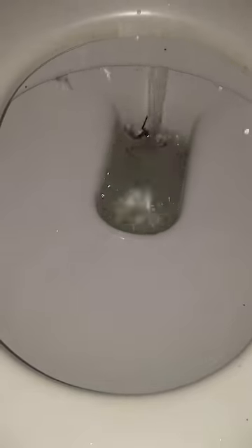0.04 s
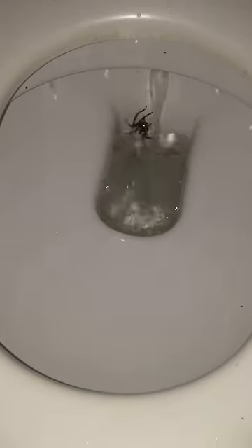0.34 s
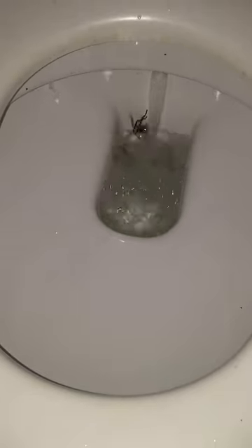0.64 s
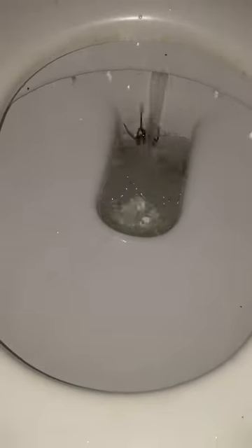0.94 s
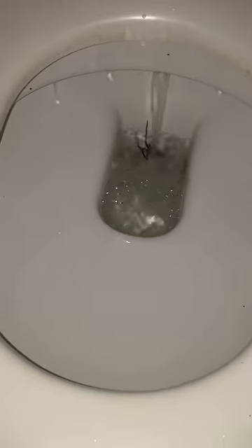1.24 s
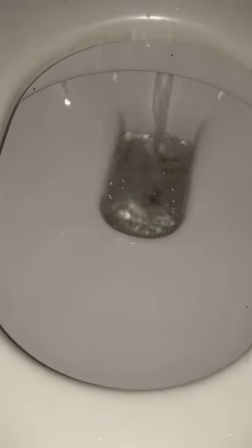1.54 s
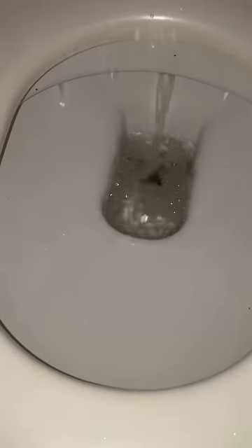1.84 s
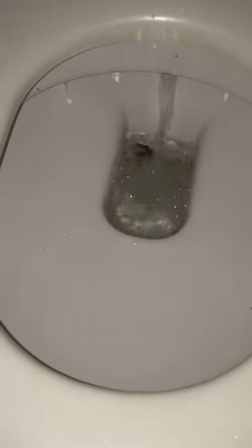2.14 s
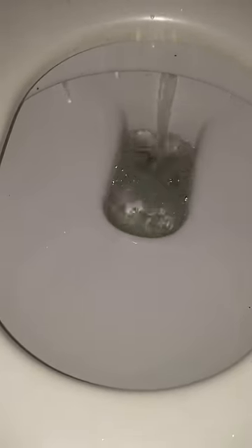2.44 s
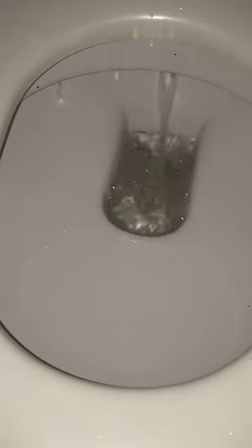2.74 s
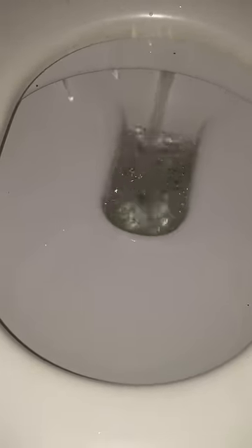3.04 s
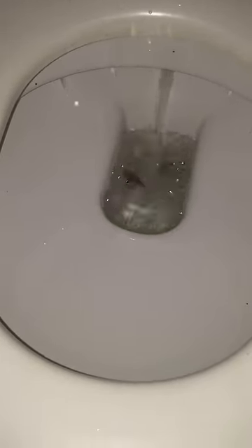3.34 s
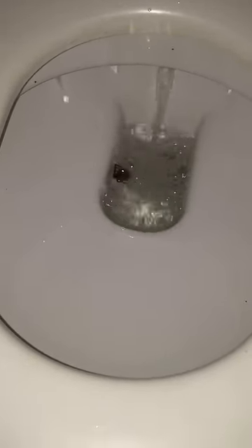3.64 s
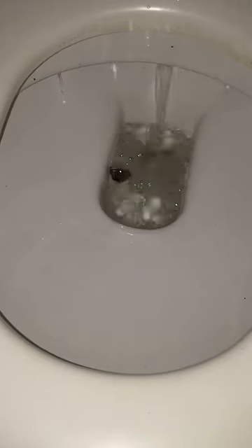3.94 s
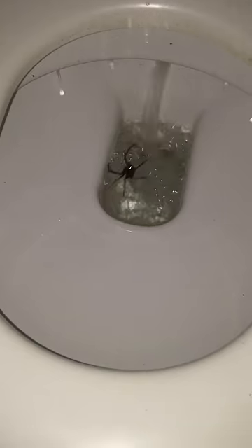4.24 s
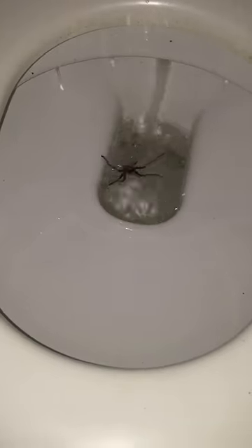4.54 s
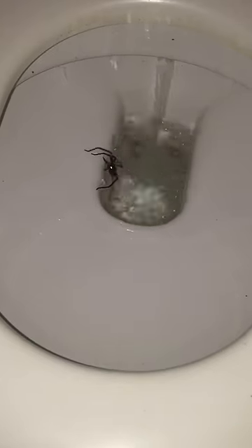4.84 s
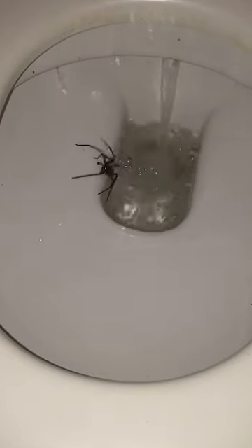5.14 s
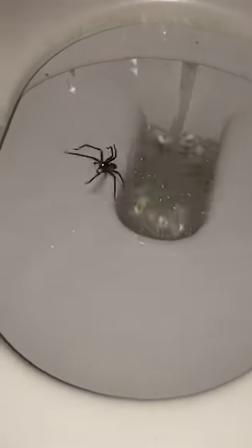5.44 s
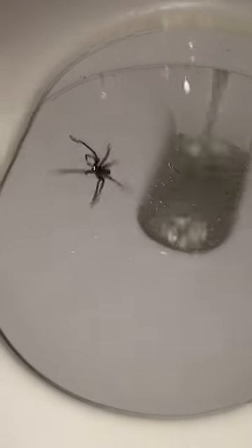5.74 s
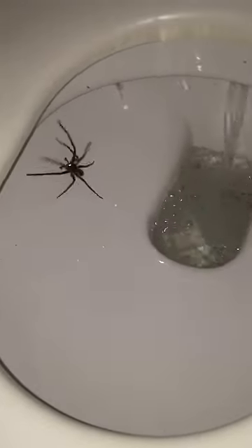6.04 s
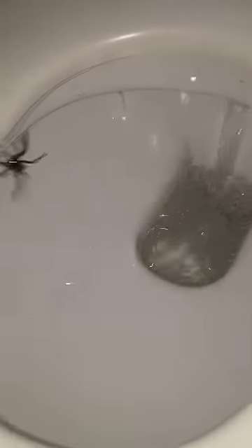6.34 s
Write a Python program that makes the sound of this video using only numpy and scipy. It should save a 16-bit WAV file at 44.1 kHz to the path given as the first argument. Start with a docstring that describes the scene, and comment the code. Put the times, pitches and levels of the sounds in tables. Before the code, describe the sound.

A thin stream of water pours continuously into the pool of a toilet bowl. A sharp little bubble snap comes right at the start, then the water babbles on with low, hollow gulps, chirping bubbles and ticking drops, now and then splashing harder. It is heard close up, ringing in the porcelain bowl and a small, hard-walled bathroom, over a faint low rumble.

```python
"""In a small, hard-walled bathroom, a thin stream runs from a toilet's rim into the pool below.
It drags air under the water: big pockets gulp, small bubbles chirp upward, and one bursts with a snap.
Drops of spray tick on the pool, and now and then the stream breaks up and splashes harder.
The water is heard close up, ringing in the hollow bowl and the room, over a faint low rumble."""
import sys
import numpy as np
from scipy import signal
from scipy.io import wavfile

SR = 44100
rng = np.random.default_rng(int(sys.argv[2]) if len(sys.argv) > 2 else 0)


def persist_wave(psi):
    """Save psi, clipped to +-1, as 16-bit WAV."""
    counts = np.round(np.clip(psi, -1, 1) * 32767).astype(np.int16)
    wavfile.write(sys.argv[1], SR, np.atleast_2d(counts).T)


N = 282240

TIME = np.arange(N) / SR
YIELD_S, CRACK_S = 0.005, 0.00068  # how long the surface gives way under a drop, and how long it cracks
SHORT_RING_CYCLES, LONG_RING_CYCLES = 14, 21  # how many swings a bubble rings for


def to_gain(db):
    """Turns decibels into a gain to multiply by."""
    return 10 ** (np.asarray(db) / 20)


def levelled(x):
    """Scales a sound to an average (rms) level of 1."""
    return x / np.sqrt(np.mean(x ** 2) + 1e-20)


def die_away(t, t60):
    """A smooth fade, 60 dB down after t60 seconds."""
    return np.exp(-np.log(1000) * t / t60)


def mix_in(mix, s, sound):
    """Mixes a sound in, starting at s seconds."""
    start = round(s * SR)
    part = mix[max(start, 0):]
    sound = sound[max(-start, 0):][:len(part)]
    part[:len(sound)] += sound


def shape_tone(x, points, size=4096):
    """Makes some pitches louder and others softer, along a curve of (Hz, dB) points."""
    hz, db = np.transpose(points)
    bin_hz = abs(np.fft.fftfreq(size, 1 / SR))
    log_gain = np.log(to_gain(np.interp(np.log(bin_hz + 1), np.log(hz), db)))
    taps = np.fft.ifft(np.exp(np.conj(signal.hilbert(log_gain)))).real  # rings only after a sound
    return signal.oaconvolve(x, taps[:size // 2])[:len(x)]


def cut_lows(x, hz, order=2):
    """Turns down what lies below hz."""
    return signal.sosfilt(signal.butter(order, hz, "high", fs=SR, output="sos"), x)


# First echoes off the porcelain. Each row: delay in seconds, gain.
PORCELAIN_ECHOES = [(.00055, 0.24), (.0013, 0.22), (.0033, 0.2), (.0058, 0.12), (.011, 0.16),
                    (0.0153, 0.15)]
# Notes at which the air in the bowl and room rings.
# Each row: pitch in Hz, ring time in seconds, strength in dB.
AIR_NOTES = [(204.5, 0.66, 21.5), (239.4, 0.47, 24), (263, 0.22, 19.5), (280.1, 0.43, 26),
             (342.8, 0.19, 15), (455, 0.26, 9), (513.6, 0.21, 11.5), (578.3, 0.073, 16),
             (610.2, 0.34, 22.5), (970, 0.26, 10.5), (1011.5, 0.27, 12.5), (1046.6, 0.28, 20),
             (1193, 0.28, 5), (1503, 0.16, 7), (1502, 1, 4), (1806, 0.34, 10.5), (1892, 0.23, 3),
             (1986, 0.32, 12.5), (2224, 0.16, 14.5), (2255, 0.22, 10), (2621, 0.11, 3.5)]

def bowl_response(spot_db=2.5, spot_detune=0.006):
    """How a click at one spot of the pool reaches us: directly, as echoes, and as ringing air."""
    t = TIME[:SR // 2]
    path = np.zeros(len(t))
    for delay, gain in [(0.00016, 0.91)] + PORCELAIN_ECHOES:  # the direct sound comes first
        mix_in(path, delay, np.array([gain]))
    scatter, room = rng.standard_normal((2, len(t))) * (1 - die_away(t, 0.0015))
    tail = to_gain(-5.5) * levelled(scatter * die_away(t, 0.063))
    tail += to_gain(0.5) * levelled(room * die_away(t, 0.2))
    path += cut_lows(tail, 326) / np.sqrt(len(t))
    for (hz, t60, db), (louder, higher) in zip(AIR_NOTES, rng.uniform(-1.2, 1, (len(AIR_NOTES), 2))):
        hz *= 1 + spot_detune * higher  # each spot rings the notes a little differently
        db += spot_db * louder
        ring = die_away(t, t60)
        path += to_gain(db) * 2 * ring / ring.sum() * np.cos(2 * np.pi * hz * t)
    return cut_lows(path, 117, order=4)


def in_bowl(sound, spots, peak_db, direct=0):
    """Plays a sound from a random spot of the pool; one out in the open has more direct sound."""
    wet = signal.fftconvolve(sound, spots[int(rng.random() * len(spots))])
    mix_in(wet, 0, direct * cut_lows(sound, 230, order=4))
    return to_gain(peak_db) * wet / abs(wet).max()


def wander_over_pool(source, spots, per_s=14):
    """The stream wanders over the pool, so the bowl colours it differently from moment to moment."""
    steps = rng.random(400) * (len(spots) - 1)
    where = np.interp(TIME * per_s, np.arange(len(steps)), steps)
    out = np.zeros(N)
    for spot, path in enumerate(spots):
        nearness = np.maximum(1 - abs(where - spot), 0)
        out += signal.oaconvolve(source * np.sqrt(nearness), path)[:N]
    return out


def unevenness(per_s):
    """A random curve that heads for a new value per_s times a second."""
    steps = rng.standard_normal(1000)
    return np.interp(TIME * per_s, np.arange(len(steps)), steps)


def air_bubble(hz, swell_s, cycles, rise):
    """A bubble swells and rings out; nearing the surface, its pitch climbs by rise octaves a second."""
    t60 = cycles / hz
    t = np.arange(-swell_s, t60, 1 / SR)
    level = np.where(t < 0, np.cos(np.pi / 2 * t / swell_s) ** 2, die_away(t, t60))
    return level * np.sin(2 * np.pi * np.cumsum(hz * 2 ** (rise * t)) / SR)


def wet_burst(hz, t60, octaves=1):
    """A short splash of torn water, some octaves either side of hz."""
    t = TIME[:SR // 25]
    band = signal.butter(1, [hz / 2 ** octaves, min(hz * 2 ** octaves, SR / 2 - 1)], "band", fs=SR)
    return levelled(signal.lfilter(*band, rng.standard_normal(len(t)))) * die_away(t, t60)


# How strongly bubbles of each size ring within a swarm. Each row: pitch in Hz, strength in dB.
BUBBLE_STRENGTHS = [(240, -6), (450, -5.5), (750, -2.5), (1050, -6.5), (1600, 3), (2400, -1), (3100, 14),
                    (4200, 6.5), (5800, -1.5), (8000, -11), (13000, -2.5)]

def bubble_swarm(low_hz, high_hz, spread_db, cycles, swell_cycles, rise, count, sizes=130):
    """Bubbles of many sizes, each size born count times at random moments and strengths."""
    out = np.zeros(N)
    for step, (jitter, length, onset, climb) in enumerate(rng.random((sizes, 4))):
        hz = low_hz * (high_hz / low_hz) ** ((step + jitter) / sizes)
        swell_s = (0.5 + swell_cycles * onset ** 2) / hz
        ping = air_bubble(hz, swell_s, cycles * (0.5 + length), 2 * rise * climb)
        ping *= to_gain(np.interp(hz, *np.transpose(BUBBLE_STRENGTHS)))
        when, chance = rng.random((2, count))
        for start, gain in zip(when * N / SR, to_gain(-spread_db * np.log(chance + 0.052))):
            mix_in(out, start, gain * ping)
    return out


def droplets(low_hz=4200, high_hz=14000, spread_db=4, tilt_db=-3, crack_db=4, ping_db=6, count=450):
    """Flung droplets land one by one, each with a brief wet tick and a tiny ping of its own pitch."""
    out = np.zeros(N)
    for when, pitch, softness in rng.random((count, 3)):
        hz = low_hz * (high_hz / low_hz) ** pitch
        tick = wet_burst(hz, t60=0.035, octaves=0.25)
        tick *= 1 - die_away(TIME[:len(tick)], YIELD_S)
        tick += to_gain(crack_db) * wet_burst(hz, CRACK_S)
        mix_in(tick, 0, to_gain(ping_db) * air_bubble(hz, CRACK_S, LONG_RING_CYCLES, rise=10))
        db = tilt_db * pitch - spread_db * np.log(softness + 0.086)
        mix_in(out, when * N / SR, to_gain(db) * tick)
    return out


# The tone of the spray. Each row: frequency in Hz, boost or cut in dB.
SPRAY_TONE = [(100, -65), (600, 2.5), (1500, 11.5), (3000, 9), (4200, 8), (6000, 3), (9000, -2),
              (12000, -10), (15000, -25)]

def fine_spray(per_s=600, spread_db=3.5, hiss_db=-6):
    """Fine droplets tick over the soft hiss of the stream on the porcelain."""
    landings = rng.random(N) < per_s / SR
    gains = to_gain(spread_db * np.minimum(rng.exponential(1, N), 4))
    ticks = landings * gains * rng.choice([-1, 1], N)
    return shape_tone(levelled(ticks) + to_gain(hiss_db) * rng.standard_normal(N), SPRAY_TONE)


def layer_gain(flow_db, surge, calm_db, follows, surge_db, usual_flow_db=-45):
    """A surface layer follows the flow by its own share, and the surges come on top."""
    return np.hypot(to_gain(calm_db + follows * (flow_db - usual_flow_db)), to_gain(surge_db) * surge)


# How hard the stream stirs the pool.
# Each row: time in seconds, surface bubbling in dB, deep churning in dB.
STREAM_FLOW = [(0.0, -44.5, -44.5), (0.73, -44, -42.5), (1.01, -44.5, -43.5), (1.34, -45.5, -42.5),
               (1.701, -45, -44), (1.991, -43, -53), (2.25, -41, -41.5), (2.78, -46, -42.5),
               (2.96, -45.5, -41), (3.53, -41.5, -49.5), (3.94, -44, -40), (4.28, -43, -45),
               (4.63, -42, -37.5), (4.83, -40.5, -50.5), (5.01, -46.5, -50), (5.191, -44.5, -46),
               (5.759, -44.5, -41.5), (6.042, -40, -37.5), (6.4, -50.5, -47)]

def stream_layers():
    """The stream stirs up four sizes of bubble, droplets and spray; gives each sound and its gain."""
    times, *levels = np.transpose(STREAM_FLOW)
    flow_db, churn_db = (np.interp(TIME, times, level) for level in levels)
    splash_surge, bubble_surge, spray_surge = stream_surges()
    lumps = to_gain(4.14 * np.tanh(unevenness(per_s=55)))  # the stream sputters as it breaks into lumps
    churn = bubble_swarm(210, 758, spread_db=3, cycles=9.6, swell_cycles=1.91, rise=11.8, count=5)
    babble = bubble_swarm(782, 2288, spread_db=-2, cycles=15.7, swell_cycles=7.2, rise=18.6, count=20)
    splashing = bubble_swarm(2214, 5320, spread_db=6.5, cycles=SHORT_RING_CYCLES, swell_cycles=11.4,
                             rise=46.6, count=20)
    fizz = bubble_swarm(5350, 13030, spread_db=3.5, cycles=19, swell_cycles=19.7,
                        rise=42, count=5, sizes=400)
    layers = [(churn, to_gain(churn_db - 0.1)),
              (babble, layer_gain(flow_db, bubble_surge, calm_db=-46, follows=1, surge_db=-12.5)),
              (splashing, layer_gain(flow_db, splash_surge, calm_db=-52, follows=1, surge_db=-6)),
              (fizz, layer_gain(flow_db, spray_surge, calm_db=-53.5, follows=0.046, surge_db=-37)),
              (droplets(), layer_gain(flow_db, spray_surge, calm_db=-54, follows=0.063, surge_db=-10.5)),
              (fine_spray(), layer_gain(flow_db, spray_surge, calm_db=-53, follows=0.76, surge_db=-33))]
    return [(source * lumps, gain) for source, gain in layers]


# The tone of the rumble. Each row: frequency in Hz, boost or cut in dB.
RUMBLE_TONE = [(10, -12), (28, -17), (48, 0.5), (85, 3.5), (130, 1.5), (200, -7), (600, -24.5),
               (4000, -24.5)]
# How the rumble swells and sinks. Each row: time in seconds, level in dB.
RUMBLE_SWELLS = [(0, -61.5), (1.15, -56), (1.8, -63), (2.4, -55.5), (2.66, -66), (3.5, -56), (3.9, -60),
                 (5.5, -62.5), (5.73, -54), (5.9, -57), (6.4, -56)]

def low_rumble(heave_db=3):
    """A faint low noise heaves unevenly beneath the sound of the water."""
    heaving = shape_tone(rng.standard_normal(N), RUMBLE_TONE) * to_gain(heave_db * unevenness(per_s=19))
    return to_gain(np.interp(TIME, *np.transpose(RUMBLE_SWELLS))) * levelled(heaving)


def water_clap(hz):
    """The single pressure pulse of water closing on itself, strongest near hz."""
    phase = 2 * np.pi * hz * TIME[:SR // 100]
    return phase * (2 - phase) * np.exp(-phase)


# The tone of an air pocket slapping shut. Each row: frequency in Hz, boost or cut in dB.
SLAP_TONE = [(300, -9), (900, 8), (1600, 6.5), (3000, -2.5), (6000, -3), (10000, -1), (15000, -15)]
# Air pockets that slap shut and split in two. Each row: start in seconds, the large part's level in dB
# and pitch in Hz, the small part's level in dB and rough pitch in Hz, the slap's level in dB.
AIR_POCKETS = [(0.017, -36, 266, -62, 615, -30.5), (0.082, -36.5, 277, -69, 620, -47),
               (0.143, -43, 305, -39.5, 587, -35), (0.237, -34, 271, -33, 616, -28),
               (.385, -45, 280, -35, 578, -35), (0.574, -32.5, 344, -67, 370, -27),
               (0.872, -29.5, 261.6, -36, 610, -32), (1.178, -46, 263, -63, 690, -23),
               (1.252, -27.5, 290, -38, 540, -51), (1.352, -33, 290, -37, 620, -26),
               (1.547, -37, 282, -53, 596, -25), (1.989, -37.5, 278, -38.5, 594, -52),
               (2.075, -21.5, 243, -27, 540, -24), (2.123, -45, 237, -35, 473, -24.5),
               (2.272, -30.5, 278, -32, 463, -47), (2.424, -31, 265.4, -41, 610, -50),
               (2.467, -38, 276, -53, 594, -28), (2.601, -35, 269, -45, 640, -23),
               (2.903, -27, 327, -33, 570, -28.5), (2.99, -39, 262, -41, 597, -35),
               (3.098, -33.5, 283, -54, 600, -42), (3.181, -33, 348, -35, 560, -24),
               (3.3558, -24.5, 283, -29, 590, -25.5), (3.445, -28, 301, -34, 590, -25.5),
               (3.494, -29.5, 249, -32, 496, -28), (3.548, -39, 285, -33.5, 630, -24.5),
               (3.576, -31, 235, -34, 630, -20), (4.354, -33, 218, -74, 627, -27),
               (4.459, -35, 237, -38, 557, -26.5), (4.586, -46, 293, -32, 640, -33),
               (4.714, -26, 284, -30, 584, -22.5), (4.921, -32.5, 245, -39, 502, -39),
               (5.012, -40.5, 276, -36, 620, -52), (5.27, -27, 249.6, -31.5, 563, -25.5),
               (5.423, -31, 263, -30.5, 650, -31), (5.593, -40, 293, -36, 377, -58),
               (5.684, -51, 346, -27, 560, -22.5), (5.886, -25.5, 292, -57, 605, -19),
               (5.974, -25, 258, -30, 455, -21), (6.012, -40, 265, -32, 550, -48),
               (6.166, -20, 240, -25.5, 574, -31), (6.219, -62, 230, -35.5, 600, -22.5),
               (6.363, -26.5, 280, -28.5, 548, -21.5)]

def pocket_gulps(spots, large_boost_db=1, small_boost_db=5, slap_boost_db=1):
    """Each air pocket claps shut, crackles, sloshes and swings briefly, setting the bowl booming."""
    out, t = np.zeros(N), TIME[:SR // 25]
    for start, large_db, large_hz, small_db, small_hz, slap_db in AIR_POCKETS:
        large = air_bubble(large_hz, swell_s=0.00063, cycles=27.7, rise=0.98)
        mix_in(out, start, in_bowl(large, spots, large_db + large_boost_db, direct=3.7))
        small = to_gain(-11) * wet_burst(small_hz, t60=0.049)  # the slosh
        mix_in(small, 0, air_bubble(small_hz * 0.913, swell_s=0.00056, cycles=24, rise=20))
        mix_in(small, 0, to_gain(-4) * water_clap(small_hz))  # a soft thud
        mix_in(out, start, in_bowl(small, spots, small_db + small_boost_db, direct=1.5))
        tearing = np.repeat(to_gain(5 * rng.standard_normal(len(t))), SR // 1500)[:len(t)]
        closing = (1 - die_away(t, 0.009)) * die_away(t, 0.014)  # builds up, then fades
        slap = shape_tone(rng.standard_normal(len(t)) * tearing * closing, SLAP_TONE)
        slap /= abs(slap).max()
        mix_in(slap, 0, to_gain(5) * water_clap(hz=1900))
        mix_in(out, start, in_bowl(slap, spots, slap_db + slap_boost_db, direct=0.96))
    return out


# A bursting bubble. One row: start in seconds, level in dB, pitch in Hz, ring time in seconds.
BURSTING_BUBBLE = (.0855, -7.5, 6000, .0014)

def bubble_snap(spots, splash_db=-17):
    """One bubble bursts with a few very fast, bright swings."""
    out = np.zeros(N)
    start, db, hz, t60 = BURSTING_BUBBLE
    burst = to_gain(splash_db) * wet_burst(1.5 * hz, t60=0.002)
    mix_in(burst, 0, air_bubble(hz, swell_s=0.0003, cycles=hz * t60, rise=5))
    mix_in(out, start, in_bowl(burst, spots, db))
    return out


# Single bubbles that stand out. Each row: loudest moment in seconds, level in dB, pitch in Hz.
LOUD_BUBBLES = [(0.188, -36.5, 1920), (.29, -32, 594), (.466, -36.5, 3030), (.633, -33.5, 1570),
                (.724, -32.5, 1050), (.811, -33.5, 3070), (.832, -36, 2640), (.89, -28.5, 756),
                (1.084, -32, 1500), (1.552, -33.5, 1140), (1.805, -30, 1590), (1.82, -37.5, 870),
                (2.024, -32, 1800), (2.083, -28, 470), (2.126, -28, 1595), (2.161, -32, 564),
                (2.239, -29.5, 1790), (2.316, -32.5, 2400), (2.377, -31, 633), (2.631, -33.5, 866),
                (2.689, -30, 1716), (2.76, -30.5, 2640), (2.939, -37, 1600), (2.965, -29, 2480),
                (2.802, -31, 590), (3.121, -30.5, 1144), (3.137, -35, 3480), (3.181, -27, 3165),
                (3.186, -26, 1695), (3.192, -32, 376), (3.2, -23, 859), (3.254, -33.5, 603),
                (3.286, -27, 2390), (3.343, -23.5, 1786), (3.361, -26, 450), (3.363, -25, 2270),
                (3.485, -30.5, 493), (3.525, -32, 2120), (3.605, -18.5, 2370), (3.629, -30, 1246),
                (3.666, -30, 1430), (3.749, -34, 3770), (3.807, -24, 1580), (3.852, -32.5, 2220),
                (4.134, -33, 460), (4.223, -28.5, 950), (4.274, -26, 1365), (4.412, -33, 508),
                (4.503, -27, 3950), (4.518, -25.5, 2765), (4.571, -30.5, 1290), (4.603, -30, 1560),
                (4.616, -34, 1330), (4.755, -28, 1560), (5.114, -31.5, 1090), (5.484, -37, 1017),
                (5.506, -30, 2630), (5.553, -25.5, 2500), (5.639, -29, 619), (5.645, -29.5, 930),
                (5.687, -25.5, 409), (5.704, -30, 513), (5.781, -29.5, 995), (5.796, -31.5, 1390),
                (5.838, -27.5, 1350), (5.889, -27, 1596), (5.94, -28, 1600), (6.005, -30, 1605),
                (6.052, -26, 1200), (6.085, -26.5, 680), (6.126, -32.5, 1095)]

def loud_bubbles(spots, trim_db=-1, swell_s=0.0083, shed_db=-8, shed_s=0.014, shed_octaves=0.37):
    """Bubbles plink out of the babble, each tearing the surface and shedding two of other pitches."""
    out = np.zeros(N)
    for peak_s, db, hz in LOUD_BUBBLES:
        sound = np.zeros(SR // 16)
        rise = min(30, hz / 30)  # large, low bubbles climb slowly
        mix_in(sound, 0, air_bubble(hz, swell_s, LONG_RING_CYCLES, rise))
        mix_in(sound, swell_s, to_gain(-13) * wet_burst(hz, t60=0.033, octaves=0.48))
        for late, pitch in rng.random((2, 2)):
            shed_hz = hz * 2 ** (shed_octaves * (2 * pitch - 1))
            shed = air_bubble(shed_hz, 1 / hz, SHORT_RING_CYCLES, rise=0)
            mix_in(sound, swell_s / 2 + shed_s * late, to_gain(shed_db) * shed)
        mix_in(out, peak_s - swell_s, in_bowl(sound, spots, db + trim_db))
    return out


# Drops that strike the pool. Each row: start in seconds, level in dB, pitch of the ping in Hz.
FALLING_DROPS = [(.2306, -33, 5960), (0.313, -33.5, 5700), (0.4326, -28.5, 7400), (.574, -36, 9440),
                 (0.602, -26, 4800), (0.72, -23.5, 3700), (0.773, -23, 8900), (0.776, -24, 1540),
                 (0.851, -27, 6700), (0.993, -29, 6640), (1.181, -24, 8630), (1.1983, -34, 12500),
                 (1.284, -29.5, 8200), (1.4594, -35, 7700), (1.598, -27.5, 1610), (1.8202, -29, 6900),
                 (1.9, -30, 11400), (1.928, -24.5, 5900), (1.989, -29, 6350), (1.9986, -22, 5300),
                 (2.026, -27, 8600), (2.5032, -29, 4500), (2.554, -31, 5740), (2.601, -37, 5400),
                 (2.724, -26, 5640), (2.7975, -24, 7200), (2.8084, -24.5, 5930), (2.8475, -27, 8000),
                 (2.9035, -13.5, 8530), (2.907, -18, 6000), (2.962, -26, 2300), (2.985, -29, 6140),
                 (3.0465, -29, 9100), (3.096, -28, 9300), (3.131, -32, 11700), (3.2003, -21.5, 10200),
                 (3.311, -28.5, 5230), (3.357, -41, 2110), (3.602, -21, 2110), (3.627, -27, 11700),
                 (3.6687, -21, 9500), (3.779, -31, 3940), (3.822, -31, 9600), (3.942, -33.5, 6260),
                 (4.09, -28, 4900), (4.2626, -26, 7600), (4.3674, -32, 5640), (4.407, -26, 3110),
                 (4.546, -23.5, 3140), (4.596, -23, 2930), (4.614, -22, 6730), (4.655, -26, 1420),
                 (4.662, -29.5, 6400), (4.715, -27.5, 2370), (4.816, -28, 3090), (4.938, -27.5, 6670),
                 (5.015, -36, 5770), (5.138, -36, 7900), (5.213, -22.5, 8560), (5.217, -24, 4850),
                 (5.2297, -34, 8150), (5.3632, -30, 5860), (5.51, -21, 6560), (5.611, -26, 7600),
                 (5.885, -19.5, 8900), (5.888, -20, 4200), (6.044, -25.5, 5640), (6.058, -24.5, 7100),
                 (6.257, -29, 8270), (6.3134, -29, 5500)]

def falling_drops(spots, boost_db=2.5, crack_db=11):
    """A drop cracks the surface, slaps it and pinches off a tiny bubble that pings."""
    out = np.zeros(N)
    for start, db, hz in FALLING_DROPS:
        slap = wet_burst(hz * 0.75, t60=0.011)
        slap *= 1 - die_away(TIME[:len(slap)], YIELD_S)
        mix_in(slap, 0, air_bubble(hz, swell_s=0.0012, cycles=25, rise=3.5))
        mix_in(slap, 0, to_gain(crack_db) * wet_burst(hz, CRACK_S, octaves=1.34))
        mix_in(out, start, in_bowl(slap, spots, db + boost_db, direct=0.34))
    return out


# Moments when the stream breaks up and splashes.
# Each row: start in seconds, length in seconds, then strength in dB of splashing, bubbling and spray.
STREAM_SURGES = [(0.416, 0.31, -43.5, -34.5, -38.5), (0.698, 0.12, -38.5, -29, -45),
                 (2.748, 0.046, -34, -28, -41), (3.121, 0.028, -46, -26, -39.5),
                 (3.306, 0.12, -38.5, -27, -44), (3.672, 0.12, -36, -36, -41.5),
                 (4.454, 0.34, -39.5, -42, -39), (5.474, 0.052, -37.5, -27.5, -29.5),
                 (5.882, 0.088, -39, -35, -49)]

def stream_surges(attack_s=0.0075, t60=0.17):
    """Gain curves for splashing, bubbling and spray: each surge sets in quickly, holds and dies away."""
    gains = np.zeros((3, N))
    for start, length, *db in STREAM_SURGES:
        attack = np.clip((TIME - start) / attack_s + 1, 0, 1)
        ending = die_away(np.maximum(TIME - start - length, 0), t60)
        gains += to_gain(db)[:, None] * attack * ending
    return gains


def scene():
    """The running stream and its louder gulps, plinks and drops ring in the bowl, over the rumble."""
    spots = [bowl_response() for _ in range(5)]
    layers = stream_layers()
    water = pocket_gulps(spots) + loud_bubbles(spots) + falling_drops(spots) + bubble_snap(spots)
    for source, gain in layers:
        water += gain * levelled(wander_over_pool(source, spots))
    return (water + low_rumble())[None]


# The tone of the microphone. Each row: frequency in Hz, boost or cut in dB.
MICROPHONE_TONE = [(60, -3.5), (150, -9), (240, -2.5), (410, -6.5), (480, -3.5), (600, -1.5), (750, -7.5),
                   (1100, -1), (1700, -1), (3000, -0.5), (4200, -0.5), (6500, -2), (10000, -2), (15000, -1)]

def record(dry, cutoff_hz=15550):
    """The microphone colours the sound, and the very highest treble is cut off."""
    treble_cut = signal.firwin(401, cutoff_hz, window=("kaiser", 8), fs=SR)
    return signal.oaconvolve(shape_tone(dry[0], MICROPHONE_TONE), treble_cut, "same")[None]


dry = scene()
out = record(dry)
persist_wave(out)
```